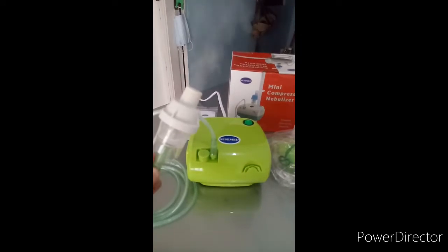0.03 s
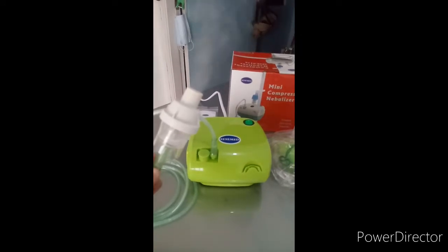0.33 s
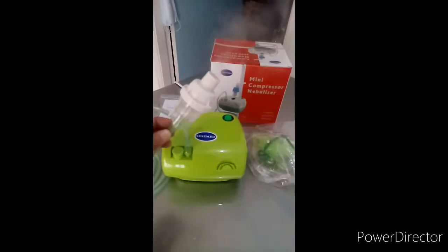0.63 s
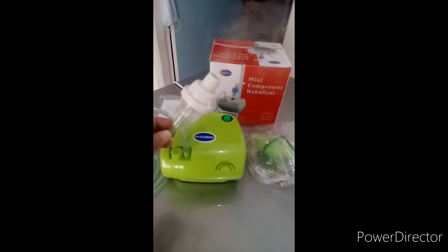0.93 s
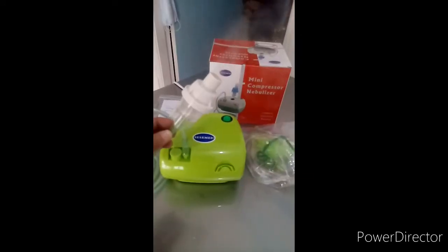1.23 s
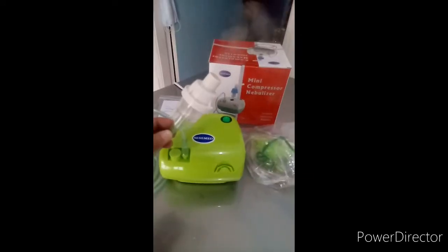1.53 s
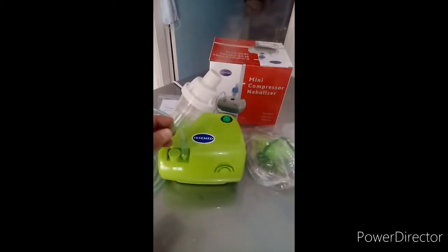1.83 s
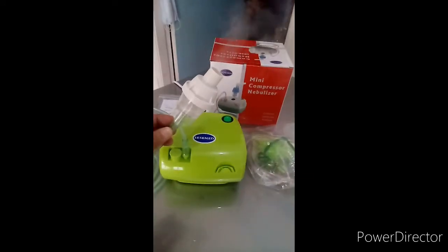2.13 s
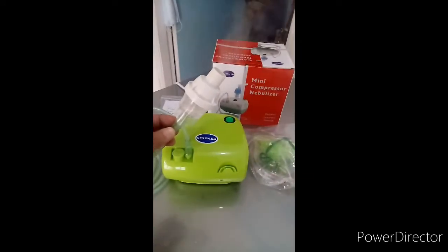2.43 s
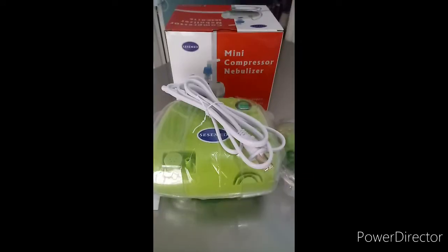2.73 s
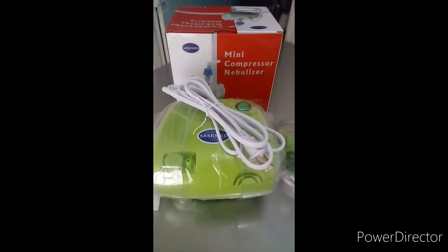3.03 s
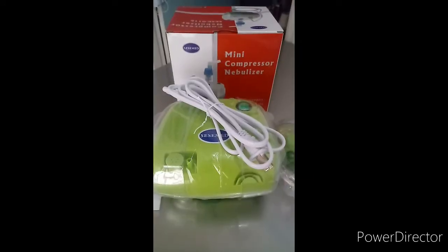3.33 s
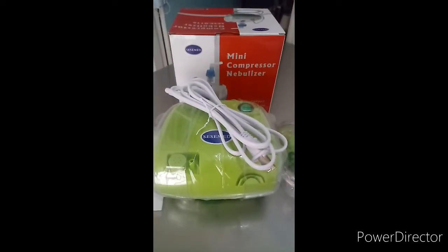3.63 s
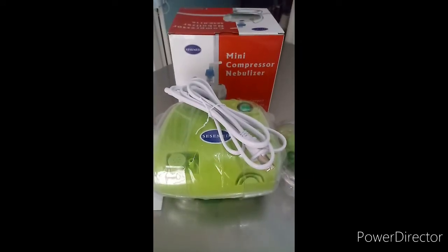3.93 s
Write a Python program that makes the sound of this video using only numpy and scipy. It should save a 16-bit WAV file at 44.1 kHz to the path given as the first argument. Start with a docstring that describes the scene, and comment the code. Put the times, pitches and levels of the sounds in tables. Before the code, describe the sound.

Steady motor buzz and sputtering hiss of a small nebulizer, stopping abruptly into faint room noise.

```python
"""A close, knocking buzz with a sputtering hiss: a piston compressor drives a nebulizer on a table. Piston and
valves knock three times a turn through the plastic case; the jet tears the liquid and rings the medicine cup.
The hiss changes colour with a tick at 0.35 s. The buzz and hiss stop abruptly at 2.37 s and leave the room:
motor and mains hum over soft noise, which changes colour at a second tick."""
import sys
import numpy as np
from scipy import signal
from scipy.fft import rfft, irfft
from scipy.io import wavfile
from scipy.ndimage import map_coordinates

SR = 44100
rng = np.random.default_rng(int(sys.argv[2]) if len(sys.argv) > 2 else 0)


def unload_wav(signal):
    """Save mono or channel-first audio to the path in sys.argv[1] as 16-bit WAV at rate SR, clipped to [-1, 1]."""
    wavfile.write(
        sys.argv[1],
        SR,
        np.round(np.clip(np.atleast_2d(signal).T, -1, 1) * 32767).astype(np.int16),
    )


N = 176400

HISS_SHIFT_S, STOP_S, ROOM_SHIFT_S = 0.3522, 2.373, 3.7721
SHAFT_HZ, SHAFT_WANDER = 53.265, 0.00076

# case buzz (shaft multiple [-], relative level [dB])
CASE_HARMONICS = [(1, -4.5), (2, 1), (3, -8), (4, -10.5), (5, -11), (6, -11), (7, -9.5), (8, -15.5),
                  (9, -4), (10, -28.5), (11, -10.5), (12, -9), (13, -9), (14, -25), (15, -12), (16, -3.5),
                  (17, -16.5), (18, -10.5), (19, -7), (20, -19.5), (21, -6.5), (22, -12), (23, -24.5),
                  (24, -13.5), (25, -16), (26, -60), (27, -33), (28, -46), (29, -16), (30, -16),
                  (31, -28.5), (32, -16.5), (33, -24.5), (34, -22), (35, -21), (36, -35), (37, -15),
                  (38, -38.5), (39, -60.5), (40, -36), (41, -22), (42, -49), (43, -32), (44, -37),
                  (45, -20), (46, -48), (47, -37), (48, -34), (49, -28), (50, -27), (51, -23), (52, -44)]
# piston and valve knocks (position [turns], relative level [dB])
TURN_KNOCKS = [(.39, -2.5), (.74, -2.5), (.97, -6.5)]
# pump air and rattle (frequency [Hz], relative density [dB])
PUMP_SPECTRUM = [(25, -1), (90, -1), (200, -1), (400, -7.5), (520, 5), (660, 1), (850, -4.5), (1300, -5),
                 (1450, -8.5), (2000, -7.5), (2700, -15), (3100, -20.5), (4000, -31)]
# cup resonances, before and after HISS_SHIFT_S (frequency [Hz], width [Hz], relative gain [dB])
CUP_EARLY_MODES = [(4475, 280, -8), (4705, 260, -6.5), (5210, 410, -0.5), (5440, 170, 0.5),
                   (5610, 130, -1.5), (5800, 140, -11), (5990, 290, -4)]
CUP_LATE_MODES = [(4155, 210, -18.5), (4452, 203, -9.5), (4600, 160, -9), (5057, 146, 0), (5193, 220, 0.5),
                  (5395, 210, -3), (5710, 73, -10), (6030, 290, -18), (6090, 320, -18.5)]
# spray hiss (frequency [Hz], relative density [dB])
SPRAY_SPECTRUM = [(2500, -32), (3800, -25.5), (4300, 1.5), (6500, -3.5), (6950, -3), (7350, 1.5),
                  (7650, 8.5), (7980, -7.5), (8220, 6), (8550, -2.5), (9020, -3), (9250, 2.5), (9600, -4),
                  (9900, 2), (10350, -25.5), (11200, -24), (12000, -21), (13100, -16), (14000, -5),
                  (14700, 1), (15500, -3)]
# extra spray colour, before HISS_SHIFT_S (frequency [Hz], relative gain [dB])
SPRAY_EARLY_EQ = [(3000, 1), (7000, 1.5), (9500, 1.5), (12000, 2), (14000, 2), (15300, 6)]
# jet strength (time [s], gain [dB])
JET_ENVELOPE = [(0, 1), (.4, 0.2), (.8, 0.2), (1.05, 1), (1.4, 0.8), (1.85, 1.5), (2.15, -.3), (2.37, -0.4)]
# ticks (time [s], peak [dB])
TICK_EVENTS = [(0.351, -25), (3.7724, -32)]
# distant motor and mains (frequency [Hz], rms level [dB])
HUM_TONES = [(57.9, -52.5), (61.8, -62), (120, -48.5), (231.5, -51), (753, -70.5), (1214, -71),
             (1389, -72.5), (1447, -67), (1505, -69.5)]
# room noise before and after ROOM_SHIFT_S (frequency [Hz], relative density [dB])
ROOM_EARLY_SPECTRUM = [(25, -3), (70, -5.5), (150, -0.5), (230, -2), (330, -3.5), (520, -10), (850, -11),
                       (1100, -12.5), (1500, -13), (1800, -17.5), (2250, -17.5), (2480, -25.5), (2600, -23),
                       (2950, -29.5), (3300, -23.5), (3850, -22.5), (4200, -22.5), (4650, -29.5),
                       (4820, -30), (5120, -41), (5800, -27), (6100, -29), (6450, -24.5), (6750, -34.5),
                       (7100, -45), (7700, -58.5), (16000, -65)]
ROOM_LATE_SPECTRUM = [(25, -11), (70, -2), (230, 0.5), (400, -4.5), (560, -11.5), (800, -8.5), (1100, -15),
                      (1350, -18), (1500, -10), (1800, -24), (2250, -23), (2800, -26), (3500, -20.5),
                      (4100, -32), (4800, -38), (5300, -37), (5750, -28), (6100, -36), (6550, -32),
                      (7100, -47), (7700, -60), (16000, -65)]
# thin ring in the room (frequency [Hz], width [Hz], rms level [dB])
ROOM_RING_MODE = (3590, 180, -69)
# echoes off table, box and walls (delay [s], gain [dB])
NEAR_ECHOES = [(.0047, -16), (.0083, -16.5), (0.0118, -11.5), (0.0176, -17), (0.0244, -11.5)]


def case_buzz(turns, gain_db=-44, scatter_db=.84, bass_lag_s=.008, smear_rad=.55):
    """Knocks repeat each turn; the case weights their harmonics, smears them and delays the lows."""
    tone = 0
    for k, db in CASE_HARMONICS:
        knocks = sum(undb(knock_db) * np.exp(-2j * np.pi * k * at) for at, knock_db in TURN_KNOCKS)
        cycles = k * turns - SHAFT_HZ * bass_lag_s * np.log(k)
        phase_rad = np.angle(knocks) + smear_rad * rng.standard_normal()
        tone += undb(db) * np.cos(2 * np.pi * cycles + phase_rad)
    return np.sqrt(2) * tone * undb(gain_db - scatter_db * walk(25))


def pump_air(turns, decay_s=.0049, depth=.75):
    """Rushing air and loose rattle swell with each knock."""
    swell = sum(undb(db) * np.exp(-((turns - at) % 1) / SHAFT_HZ / decay_s) for at, db in TURN_KNOCKS)
    rush = (1 + depth * swell) * rng.standard_normal(N)
    return level(colour(rush, PUMP_SPECTRUM), -44.5)


def jet(t, sputter_hz=257, sputter_db=2):
    """The jet tears the liquid in uneven spurts, which ring the cup and hiss from its mouth."""
    spurts = undb(sputter_db * walk(sputter_hz))
    spray = colour(spurts ** .45 * rng.standard_normal(N), SPRAY_SPECTRUM)
    before = level(cup_ring(spurts, CUP_EARLY_MODES), -38.5) + level(colour(spray, SPRAY_EARLY_EQ), -52.5)
    after = level(cup_ring(spurts, CUP_LATE_MODES), -38) + level(spray, -54)
    gain = undb(np.interp(t, *np.array(JET_ENVELOPE).T))
    return reflect(np.where(t < HISS_SHIFT_S, before, after)) * gain


def cup_ring(spurts, modes):
    """Spurts of noise drive the cup's resonances."""
    return sum(undb(db) * resonate(spurts * rng.standard_normal(N), hz, width_hz)
               for hz, width_hz, db in modes)


def ticks(t, decay_s=.0015):
    """Small sharp steps that die away fast."""
    return sum(undb(db) * (t >= at_s) * np.exp(-np.abs(t - at_s) / decay_s) for at_s, db in TICK_EVENTS)


def room_hum(wander_hz=.35, waver_db=1):
    """A distant motor and the mains drone, wavering slightly in pitch and level."""
    hum = 0
    for hz, db in HUM_TONES:
        cycles = np.cumsum(hz + wander_hz * walk(3.5)) / SR + rng.random()
        hum += np.sqrt(2) * undb(db + waver_db * walk(2.3)) * np.sin(2 * np.pi * cycles)
    return hum


def room_noise(t, rms_db=-49.5):
    """Soft noise; a thin ring joins it from STOP_S until the colour shifts."""
    air = flicker(reflect(rng.standard_normal(N)))
    ring_hz, width_hz, ring_db = ROOM_RING_MODE
    ring = level(resonate(rng.standard_normal(N), ring_hz, width_hz), ring_db) * (t >= STOP_S)
    early = level(colour(air, ROOM_EARLY_SPECTRUM), rms_db)
    late = level(colour(air, ROOM_LATE_SPECTRUM), rms_db)
    return np.where(t < ROOM_SHIFT_S, early + ring, late)


def reflect(x, drift_s=.00002):
    """Add nearby echoes; their paths drift as the hand moves."""
    echoes = 0
    for delay_s, db in NEAR_ECHOES:
        position = np.arange(N) - (delay_s + drift_s * walk(2.15)) * SR
        echoes += undb(db) * map_coordinates(x, [position], order=3, mode="mirror")
    return x + echoes


def flicker(x, depth_db=1.5, rate_hz=5.3):
    """Overlapping bands swell and fade independently."""
    bin_hz = np.arange(N // 2 + 1) * SR / N
    band_position = 6 * np.log(1 + bin_hz / 500)
    spectrum = rfft(x)
    mix = 0
    for band in range(int(band_position[-1])):
        triangle = np.maximum(0, 1 - np.abs(band_position - band))
        mix += irfft(spectrum * triangle, N) * undb(depth_db * walk(rate_hz))
    return mix


def undb(db):
    """Decibels to gain."""
    return 10 ** (np.asarray(db) / 20)


def level(x, rms_db):
    """Set the rms level."""
    return x * undb(rms_db) / np.sqrt(np.mean(x ** 2))


def walk(rate_hz):
    """Smooth random motion up to about rate_hz, rms 1."""
    bin_hz = np.arange(N // 2 + 1) * SR / N
    return level(irfft(rfft(rng.standard_normal(N)) / (1 + (bin_hz / rate_hz) ** 4), N), 0)


def colour(x, points):
    """Filter by points (frequency [Hz], gain [dB]); roll off below 35 Hz."""
    bin_hz = np.arange(N // 2 + 1) * SR / N
    hz, db = np.array(points).T
    gain = undb(np.interp(np.log(bin_hz + 1), np.log(hz), db))
    return irfft(rfft(x) * gain * bin_hz / np.hypot(bin_hz, 35), N)


def resonate(x, hz, width_hz):
    """One resonance applied twice, for steep skirts."""
    b, a = signal.iirpeak(hz, hz / width_hz, fs=SR)
    return signal.lfilter(b, a, signal.lfilter(b, a, x))


def scene():
    """The machine is heard until STOP_S, where its sound ends abruptly; the room goes on. Mono."""
    t = np.arange(N) / SR
    turns = np.cumsum(SHAFT_HZ * (1 + SHAFT_WANDER * walk(4.37))) / SR
    machine = case_buzz(turns) + pump_air(turns) + jet(t)
    return (machine * (t < STOP_S) + ticks(t) + room_hum() + room_noise(t))[None]


def record(dry, top_hz=15500):
    """Steep low-pass."""
    return signal.sosfilt(signal.ellip(10, .1, 80, top_hz, fs=SR, output="sos"), dry)


dry = scene()
out = record(dry)
unload_wav(out)
```